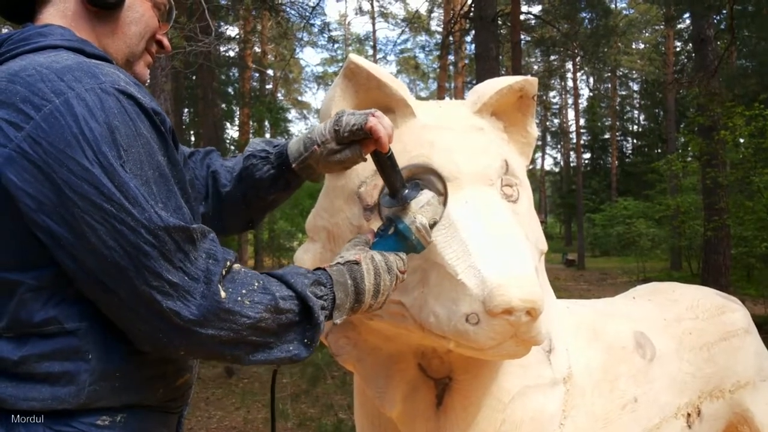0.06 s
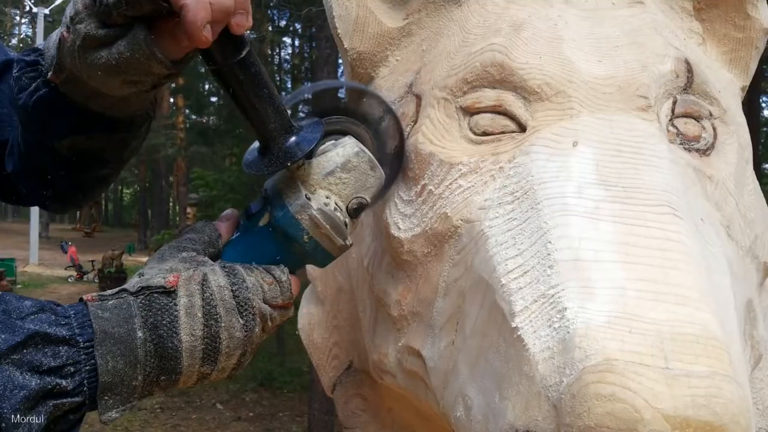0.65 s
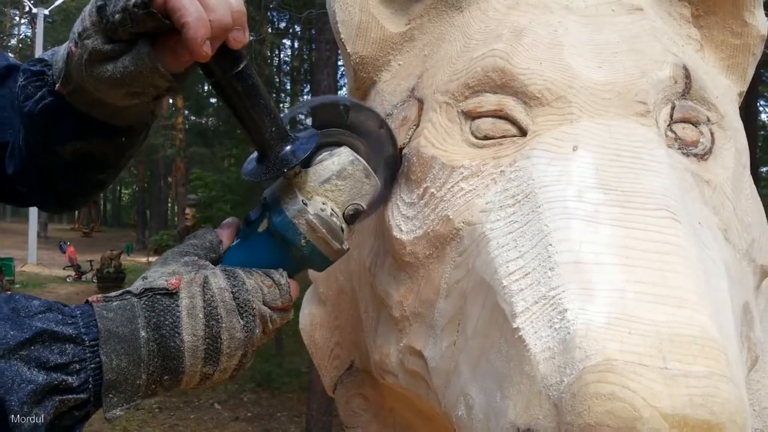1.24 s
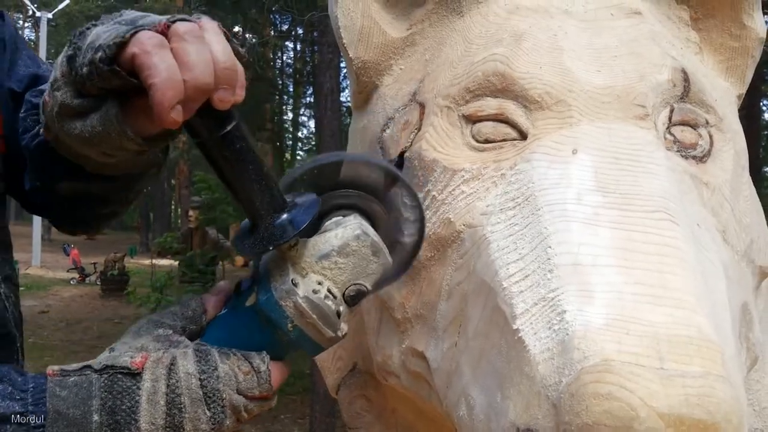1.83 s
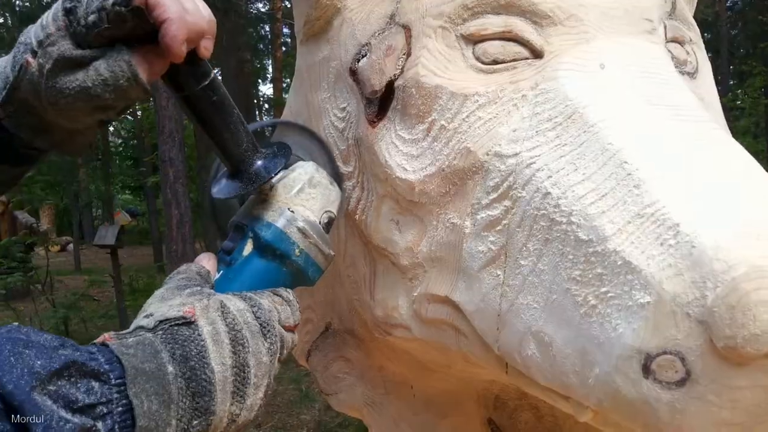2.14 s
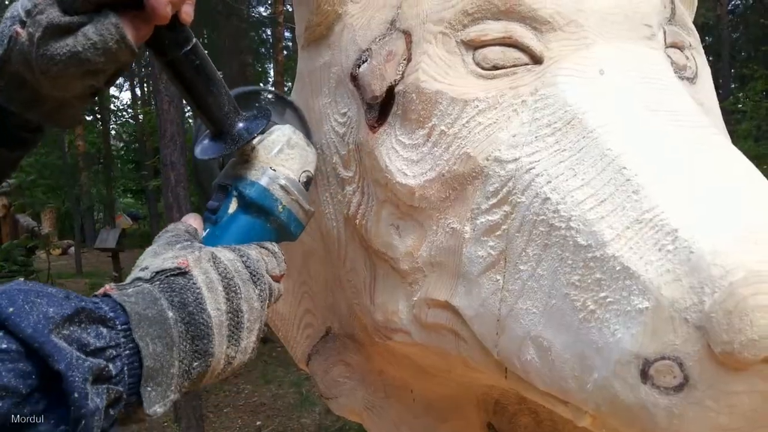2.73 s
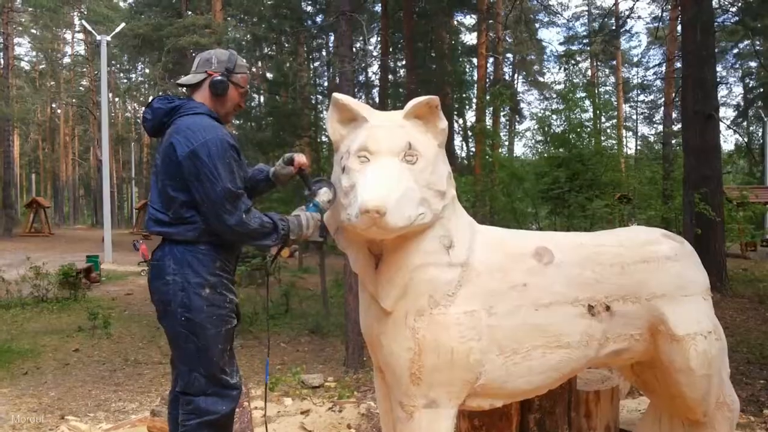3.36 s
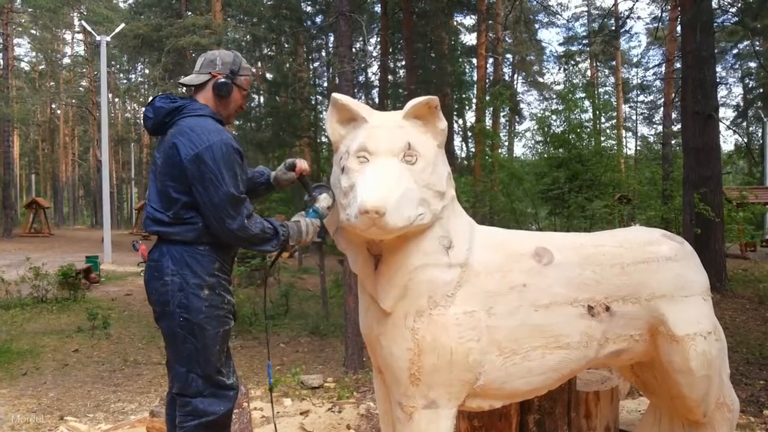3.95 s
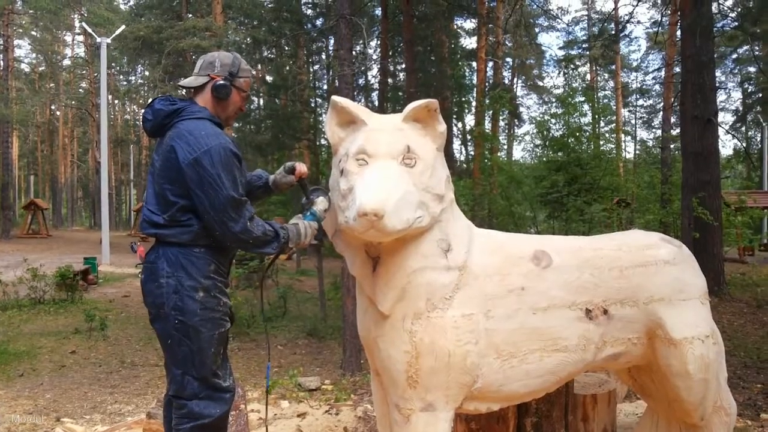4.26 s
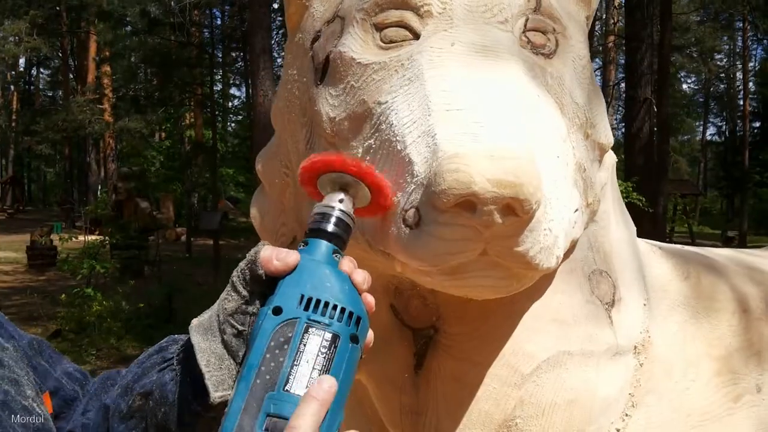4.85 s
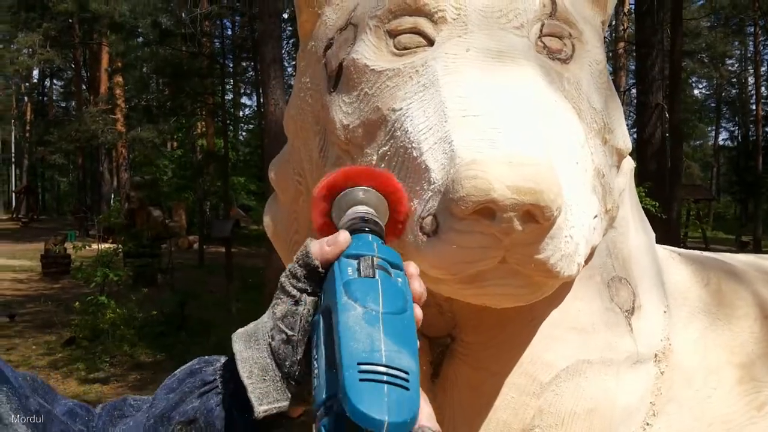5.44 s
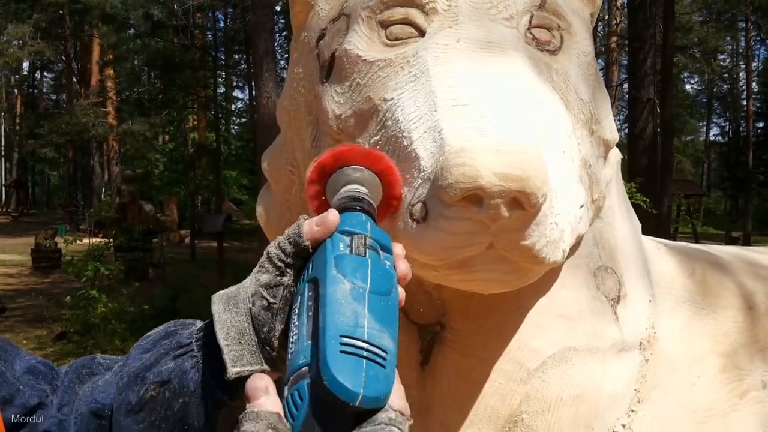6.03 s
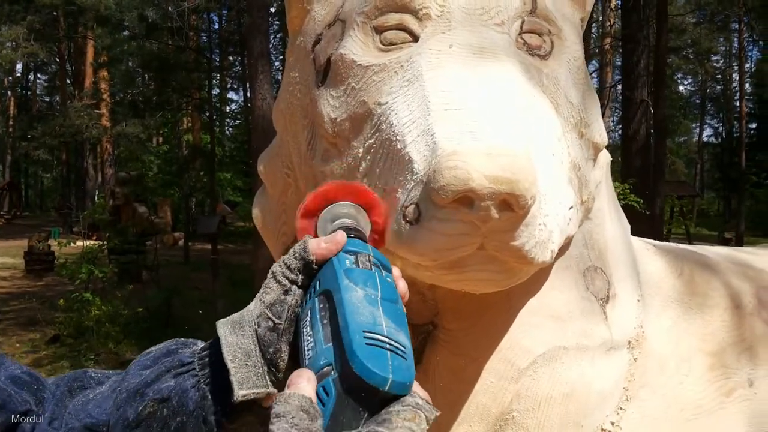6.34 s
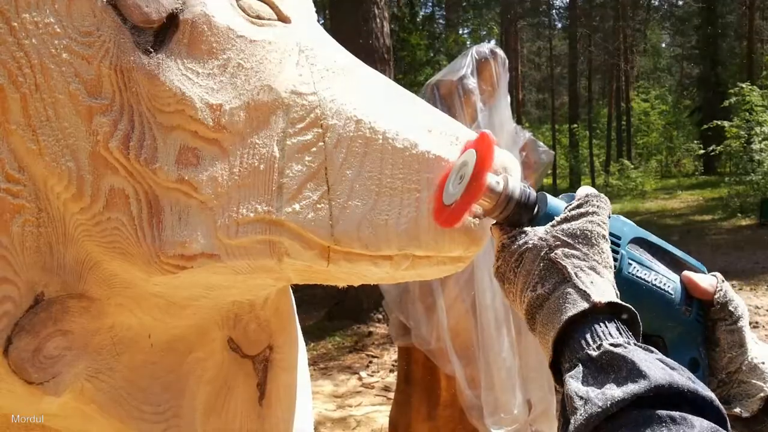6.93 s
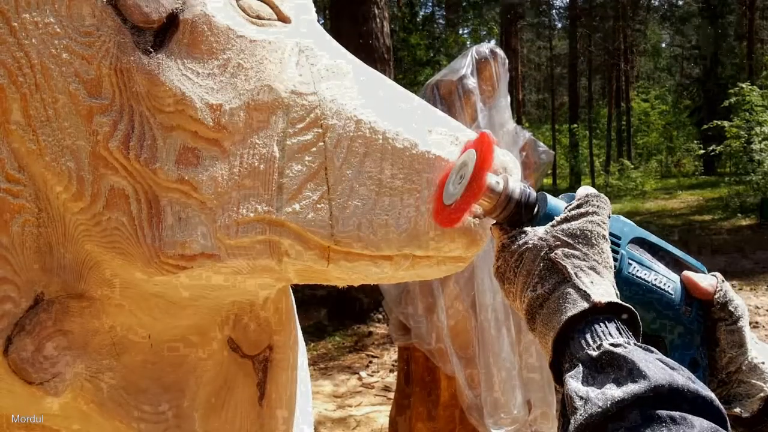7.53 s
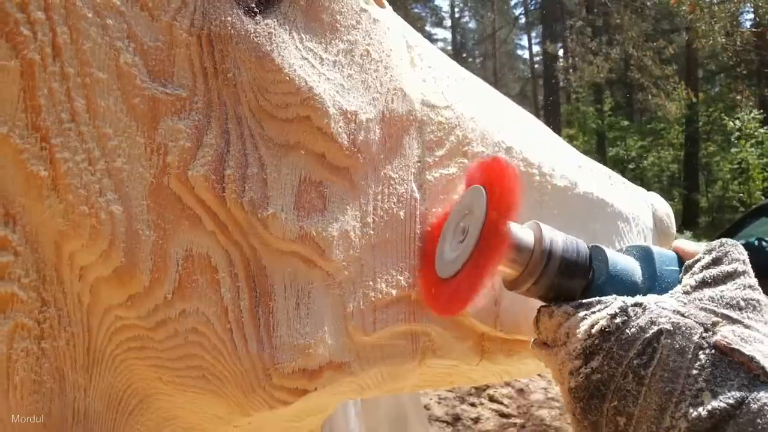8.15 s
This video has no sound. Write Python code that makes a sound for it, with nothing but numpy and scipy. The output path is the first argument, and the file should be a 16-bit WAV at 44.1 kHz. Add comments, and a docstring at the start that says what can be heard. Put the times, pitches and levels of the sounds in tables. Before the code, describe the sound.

High whining and hissing of an angle grinder sanding a wooden sculpture, a short gap, then a drill brushing the wood.

```python
"""An angle grinder with a sanding disc carves a wooden sculpture outdoors, close by and then further off.
After a moment of silence an electric drill takes over with an abrasive wheel brush. Random impacts of
grit rasp the wood, fan air and fine scratching hiss, and rotor and gears whine at multiples of the shaft
speed. A low 25 Hz flutter runs under both tools. The short stretches are cut hard together, in mono."""
import sys
import numpy as np
from scipy import signal
from scipy.fft import rfft, irfft, next_fast_len
from scipy.io import wavfile
from scipy.ndimage import uniform_filter1d, map_coordinates

SR = 44100
rng = np.random.default_rng(int(sys.argv[2]) if len(sys.argv) > 2 else 0)


def transcribe(u):
    """Save the signal u as a 16-bit wav file named by the first command-line argument.

    u: samples, shape (n,) or (channels, n), limited to [-1, 1]; the rate is SR.
    q: integer samples, one column per channel.
    """
    v = np.clip(np.atleast_2d(u).T, -1, 1)
    q = np.round(v * 32767).astype(np.int16)
    wavfile.write(sys.argv[1], SR, q)


N = 361179


def amp(db):
    """Amplitude ratio of a level in decibels."""
    return 10 ** (np.asarray(db) / 20)


def unit(x):
    """Normalisation to rms 1."""
    return x / np.sqrt(np.mean(x ** 2) + 1e-18)


def shape(x, gain):
    """Linear filtering: the spectrum is multiplied by gain(f)."""
    size = next_fast_len(len(x) + 4096)
    f = np.arange(size // 2 + 1) * SR / size + 0.00093  # the offset avoids 0 Hz
    return irfft(rfft(x, size) * gain(f), size)[:len(x)]


def colour(x, points):
    """Spectral shaping by (f/Hz, gain/dB) points with steep skirts, at rms 1."""
    hz, db = np.transpose(points)
    def gain(f):
        skirts = 1 / (1 + (.85 * hz[0] / f) ** 8) / (1 + (f / (1.08 * hz[-1])) ** 24)
        return skirts * amp(np.interp(np.log(f), np.log(hz), db))
    return unit(shape(x, gain))


def wander(t, hz):
    """Smooth random fluctuation of rms 1, with hz new values a second."""
    knots = rng.standard_normal(4096)
    return unit(map_coordinates(knots, [(t - t[0]) * hz], order=3, mode="wrap"))


def swell(t, centre, length):
    """Raised-cosine envelope, from 0 to 1 and back."""
    return np.cos(np.pi * np.clip((t - centre) / length, -.5, .5)) ** 2


def phase(hz):
    """Phase in radians is the time integral of frequency."""
    return 2 * np.pi * np.cumsum(hz) / SR


def lobe(angle, depth):
    """Periodic amplitude modulation: one peak a turn, narrower at greater depth."""
    return unit(np.exp(depth * np.cos(angle)))


def harmonics(angle, table):
    """Harmonic series of a shaft angle, from rows of (multiple, rms level/dB)."""
    return sum(np.sqrt(2) * amp(db) * np.sin(round(k) * angle + rng.uniform(0, 2 * np.pi))
               for k, db in table)


# flutter, a row a stretch (delay/s, level/dB, main resonance f/Hz, its gain/dB, upper modes' gain/dB)
FLUTTER_STRETCHES = [(0.039, -32, 197, 3.5, -9), (0.0175, -35, 186, -4.5, -6.5),
                     (0.01273, -37, 190, -1, -3), (.039, -30, 183, 2, -3.5), (0.029, -36.5, 211.4, 3, -9),
                     (0.039, -36.5, 215, 2, -7), (0.0122, -34.5, 210, 7, 4), (0.01105, -36, 192, -0.5, -15)]
# its constant low and upper resonances (f/Hz, bandwidth/Hz, gain/dB)
LOW_MODES = [(119, 18, -1), (264, 38, 2)]
UPPER_MODES = [(350.6, 17, 2), (477, 30, 1)]
# rumble spectrum (f/Hz, relative level/dB)
RUMBLE = [(20, -29), (50, -15.5), (80, -24), (120, -6.5), (180, -10), (300, -2)]
FLUTTER_HZ, FLUTTER_TOP_HZ, RUMBLE_DB = 25, 284, -8

def flutter(t, delay, db, main_hz, main_db, upper_db):
    """Forced resonance: a periodic pulse train rings low modes, over a faint rumble."""
    count = np.floor((t - delay) * FLUTTER_HZ)
    pulses = np.diff(count, prepend=count[0])
    modes = list(LOW_MODES) + [(main_hz, 34, main_db)]
    def ring(f, table):
        return sum(amp(gain) / (1 + 1j * (f * f - hz * hz) / (f * width)) for hz, width, gain in table)
    def response(f):
        low = ring(f, modes) / (1 + (f / FLUTTER_TOP_HZ) ** 20) / (1 + (80 / f) ** 4)
        return low + amp(upper_db) * ring(f, UPPER_MODES)
    rumble = amp(RUMBLE_DB) * colour(rng.standard_normal(len(t)), RUMBLE)
    return amp(db) * (unit(shape(pulses, response)) + rumble)


# the disc catches the wood (t/s, gain/dB)
KNOCKS = [(2.953, 4.5)]
# modes of the solid wood (f/Hz, relative level/dB, T60/s)
WOOD_MODES = [(330, -16, .01), (690, 4, .007)]
CRACK_DB, CRACK_T60_S = -15, .006

def knocks(t):
    """Impact excitation: fibres tear with a crack and the wood's damped modes ring briefly."""
    out = np.zeros(len(t))
    for start, db in KNOCKS:
        age = np.maximum(t - start, 0)
        ring = sum(amp(level - 60 * age / t60) * np.sin(2 * np.pi * hz * age)
                   for hz, level, t60 in WOOD_MODES)
        crack = amp(CRACK_DB - 60 * age / CRACK_T60_S) * rng.standard_normal(len(t))
        attack = 1 - np.exp(-age / 0.001)
        out += amp(db) * attack * (ring + crack)
    return out


# wavering tones in the grinder's whine (start t/s, end t/s, f/Hz, level/dB)
WAVERING_TONES = [(2.4, 3.102, 1016, -29.5), (3.094, 4.402, 1044, -38.5)]

def wavering_tones(t):
    """Random modulation: two tones near 1 kHz in the grinder's whine, unsteady in pitch and level."""
    out = np.zeros(len(t))
    for start, end, hz, db in WAVERING_TONES:
        progress = np.clip((t - start) / (end - start), 0, 1)
        envelope = np.sqrt(np.abs(np.sin(np.pi * progress)))
        tone = np.sin(phase(hz * (1 + 0.003 * wander(t, 19.8))))
        out += amp(db) * envelope * unit(tone * amp(1.9 * wander(t, 90)))
    return out


def grit(t, per_second, spread_db):
    """Shot noise: grains of uneven size strike at random instants."""
    hits = rng.random(len(t)) < per_second / SR
    return unit(hits * rng.standard_normal(len(t)) * amp(spread_db * rng.standard_normal(len(t))))


def hiss(source, spectrum, hiss_db, sizzle_db):
    """Broadband noise of fan air and fine scratching: hiss below 10 kHz, sizzle above."""
    noise = colour(source, spectrum)
    low = shape(noise, lambda f: 1 / (1 + (f / 10000) ** 16))
    return unit(low) * amp(hiss_db) + unit(noise - low) * amp(sizzle_db)


# swells and fades in either tool's whine, by rotor multiple (centre t/s, length/s, change/dB)
WHINE_SWELLS = {1: [(5.1, 0.98, 12), (7.2, 1.7, 7)], 4: [(4.93, 0.069, -16), (4.98, 0.054, 6),
                (5.63, 0.074, 4.5)], 8: [(4.99, .16, -9), (5.36, 0.11, 3), (5.47, 0.1, -4),
                (5.75, 0.19, -10), (6.15, .85, 2.5)], 10: [(1.9, 1.3, 11)], 12: [(2.37, .3, 7),
                (2.78, .4, 8), (3.05, .3, 13.5), (3.73, .12, 6), (4.2, .2, 7), (5.25, .35, 7),
                (5.53, .2, 5), (5.73, 0.26, 6.5), (6.24, .08, -8), (6.41, 0.18, 7), (6.56, .16, -4)],
                28: [(5.29, .25, 17), (7.26, .45, 7)]}

def whine_swell_db(t, multiple):
    """Slow level modulation of one harmonic by the swells centred within this stretch."""
    return sum(db * swell(t, centre, length)
               for centre, length, db in WHINE_SWELLS.get(round(multiple), []) if t[0] <= centre <= t[-1])


# resonances and notches of the drill's housing, by direction (f/Hz, bandwidth/Hz, gain/dB)
HOUSING_FRONT = [(3960, 110, -6.5), (5350, 90, 4.5), (6900, 330, 12)]
HOUSING_SIDE = [(3756, 96, 7.9), (5760, 78, 5.7)]

def housing_db(hz, housing):
    """Resonant transmission: the housing lifts or damps a tone according to its frequency."""
    return sum(db / (1 + (2 * (hz - centre) / width) ** 2) for centre, width, db in housing)


# gear mesh harmonics (rotor multiple, depth of throb)
GEAR_HARMONICS = [(4, .09), (8, .48), (12, .15)]
GEAR_RATIO = 13  # rotor turns per chuck turn
# the drill swings from side-on to end-on; side-on, each mesh harmonic has its own gain
SWING_CENTRE_S, SWING_LENGTH_S, SIDE_ON_DB = 5.06, 0.19, (15.5, 0.5, -4)

def gears(t, rotor_hz, load, housing, mesh_db, load_db):
    """Gear meshing: four contacts a rotor turn, varying with load and throbbing once a chuck turn."""
    rotor = phase(rotor_hz)
    side_on = np.clip(.5 - (t - SWING_CENTRE_S) / SWING_LENGTH_S, 0, 1)
    out = 0
    for (k, throb), db, side_db, rise_db in zip(GEAR_HARMONICS, mesh_db, SIDE_ON_DB, load_db):
        level_db = db + side_db * side_on + rise_db * load + whine_swell_db(t, k)
        level_db += housing_db(round(k) * rotor_hz, housing)
        level_db += .8 * wander(t, hz=86)  # uneven teeth
        level_db += 0.1 * wander(t, hz=6.8)  # sway of the hand
        out += harmonics(rotor, [(k, level_db)]) * lobe(rotor / GEAR_RATIO, throb)
    return out


# drill, a row a stretch (base level/dB of rasp, hiss, sizzle and mesh harmonics 1, 2, 3;
# change/dB of harmonics 1, 2 at full load)
DRILL_STRETCHES = [(-24, -26.5, -17.5, -33.5, -31.5, -35.5, 4, 3),
                   (-22.5, -22.5, -21.5, -23.5, -45, -48, 1, 2),
                   (-24.5, -28.5, -19.5, -21, -27, -33, -2, 0.5),
                   (-21.5, -28, -21, -21.5, -33, -38.5, -1, 3.5)]
# rotor speed under the hand's load (t/s, f/Hz)
SPEED_FRONT = [(4.755, 473), (4.848, 478), (4.93, 492), (5.04, 501), (5.24, 500), (5.38, 480), (5.53, 467),
               (5.62, 450), (5.706, 443), (5.78, 448), (5.96, 445), (6.11, 457), (6.225, 452), (6.36, 426),
               (6.482, 443.7), (6.665, 450)]
SPEED_LIGHT = [(6.695, 488), (6.84, 492)]
SPEED_LOADED = [(6.87, 461), (6.97, 450)]
SPEED_SIDE = [(7.06, 479), (7.27, 481.5), (7.346, 473.2), (7.494, 475.7), (7.59, 468), (7.79, 477.5),
              (7.912, 469), (8.17, 470.4)]
# spectra of the brushed wood and the drill's hiss (f/Hz, relative level/dB)
WOOD_FRONT = [(370, -14), (680, -10), (880, -6.5), (1250, -5), (1960, -4), (2050, -8.5), (2350, -3),
              (3000, -23)]
WOOD_SIDE = [(330, -5.5), (380, -12), (770, -4), (920, -2), (1570, 1), (2010, -6), (2250, -1.5),
             (3000, -18)]
AIR_FRONT = [(3000, 0), (3320, -5.5), (3540, -4.5), (4260, -3), (5380, 0.5), (6650, -5.5), (8160, -13.5),
             (11980, -13), (13690, -0.5), (15650, 3)]
AIR_LIGHT = [(3000, -19), (4200, -9), (5400, 4), (8200, -14.5), (11000, -16), (15650, -1)]
AIR_SIDE = [(3000, -15), (3430, -12.5), (3790, -6), (4050, -9), (5750, -4), (6050, -10), (8160, -18),
            (10140, -18.5), (15650, 0.5)]
# motor harmonics (rotor multiple, base level/dB)
MOTOR_FRONT = [(1, -50.5), (3, -44), (16, -49), (28, -44.5)]
MOTOR_SIDE = [(1, -40.5), (2, -39), (3, -31), (28, -35)]
# heavier and lighter brush strokes (centre t/s, length/s, change/dB of rasp, hiss, sizzle)
BRUSH_STROKES = [(4.774, 0.21, 2.5, 0, -0.5), (4.98, 0.39, 5, 3, 0), (5.132, 0.18, 2.5, 4.5, 1.5),
                 (5.273, 0.18, 2.5, 0.5, 3), (6.022, 0.8, -1.5, -3, -2), (7.095, 0.42, 2, 1, -0.5),
                 (7.77, 0.23, 2.5, .5, -0.5)]
# whine and treble dip briefly (centre t/s, length/s, change/dB of whine, hiss, sizzle)
DIP = (6.99, .12, -24, -1.5, -8.5)
LOAD_HZ_PER_S, LOAD_SMOOTH_S = 63, 0.079  # deceleration of a heavy load; time it takes to build

def drill(t, stretch, speed, wood, air, housing, motor_lines):
    """Abrasion and rotor harmonics: the brush rasps, the fan chops the air, gears and motor whine."""
    rasp_db, hiss_db, sizzle_db, *mesh_db, first_rise_db, second_rise_db = stretch
    for centre, length, more_rasp, more_hiss, more_sizzle in BRUSH_STROKES:
        stroke = swell(t, centre, length)
        rasp_db += more_rasp * stroke
        hiss_db += more_hiss * stroke
        sizzle_db += more_sizzle * stroke
    dip_centre, dip_length, whine_dip_db, hiss_dip_db, sizzle_dip_db = DIP
    dip = swell(t, dip_centre, dip_length)
    speed_hz = np.interp(t, *np.transpose(speed))
    slowing = uniform_filter1d(-np.gradient(speed_hz, t), int(LOAD_SMOOTH_S * SR))
    load = np.tanh(slowing / LOAD_HZ_PER_S)  # towards 1 as the wood brakes the wheel, -1 as it speeds up
    rotor_hz = speed_hz * (1 + 0.0005 * wander(t, 60))
    rotor = phase(rotor_hz)
    mesh = gears(t, rotor_hz, load, housing, mesh_db, (first_rise_db, second_rise_db, 0))
    radiated = [(k, db + whine_swell_db(t, k) + housing_db(round(k) * rotor_hz, housing))
                for k, db in motor_lines]
    motor = harmonics(rotor, radiated) * amp(1.5 * wander(t, 39))
    rasp = colour(grit(t, per_second=8000, spread_db=1.1), wood) * amp(rasp_db)
    airflow = grit(t, per_second=30000, spread_db=2.1) * lobe(rotor, depth=0.076)
    treble = hiss(airflow, air, hiss_db + hiss_dip_db * dip, sizzle_db + sizzle_dip_db * dip)
    return rasp + treble + (mesh + motor) * amp(whine_dip_db * dip)


# grinder, a row a stretch (base level/dB of rasp, hiss, sizzle; gain/dB of the disc's hum)
GRINDER_STRETCHES = [(-21, -24.5, -26, -3.5), (-17.5, -25.5, -22.5, 0.5), (-18.5, -24, -24, -0.5),
                     (-27.5, -33.5, -31.5, -8.5)]
# rotor speed under the hand's load (t/s, f/Hz)
GRINDER_SPEED = [(0.25, 481), (.55, 492), (.85, 489.5), (1.45, 492), (1.62, 495), (1.8, 507), (1.945, 513),
                 (1.955, 464), (2.3, 460.5), (2.85, 468), (2.98, 461), (3.1, 462), (3.35, 450), (3.63, 451),
                 (3.73, 456), (3.8, 451), (4.08, 448), (4.15, 440), (4.35, 444)]
# spectra of the sanded wood and the grinder's hiss, by position (f/Hz, relative level/dB)
WOOD_MID = [(330, -14.5), (630, -11), (1570, -2), (1840, -10.5), (2350, -5.5), (3000, -16)]
WOOD_NEAR = [(370, -11), (690, -11), (840, -2), (1200, -0.5), (1290, -4.5), (1680, 0), (2510, -3.5),
             (3000, -14)]
WOOD_CLOSE = [(370, -15.5), (720, -12), (1100, -1.5), (1340, -3.5), (1500, -2.5), (2300, -9), (2570, -8),
              (3000, -19.5)]
WOOD_FAR = [(350, 0.5), (560, -4.5), (1100, -2.5), (2010, -6.5), (2510, -3), (3000, -14.5)]
AIR_MID = [(3000, -13.5), (3670, -13.5), (4970, -1.5), (5910, -5.5), (7630, -20.5), (9260, -24),
           (10300, -16.5), (11000, -29), (14800, -4)]
AIR_NEAR = [(3000, -7.5), (4050, -11), (4950, -4), (6360, -8.5), (7700, -21.5), (9200, -18), (10140, -12.5),
            (10840, -20.5), (12810, -19.5), (14890, 0.5), (15650, -9.5)]
AIR_CLOSE = [(3000, -5), (4190, -7), (4630, 2), (5120, -2.5), (5560, -0.5), (7390, -17), (9180, -15.5),
             (9810, -12), (10840, -18.5), (15650, 1.5)]
AIR_FAR = [(3000, -6.5), (4300, -9.5), (5290, 0), (7140, -14), (8200, -24), (10310, -16), (13240, -12),
           (15650, 1)]
# harmonics of the motor, by position, and of the disc (shaft multiple, base level/dB)
MOTOR_MID = [(1, -42.5), (10, -31.5), (12, -35)]
MOTOR_NEAR = [(1, -44), (10, -38.5), (12, -41), (31, -37)]
MOTOR_CLOSE = [(1, -42.5), (12, -39.5)]
MOTOR_FAR = [(1, -38.5), (10, -42), (12, -39.5)]
DISC_HUM = [(3, -42.5), (4, -43), (7, -41)]
# the disc is pressed harder or eased off (centre t/s, length/s, change of sizzle/dB)
DISC_PRESSES = [(.09, 0.11, 2), (1.53, .15, 1.5), (2.45, 0.55, 2), (3.14, 0.18, -3), (3.345, 0.24, 4.5),
                (3.56, .1, 3), (4.134, 0.18, 5), (4.34, 0.17, 5.5)]
PRESS_RASP_SHARE, PRESS_HISS_SHARE = 0.57, 0.73  # of that change
BEVEL_RATIO = 3.7  # rotor turns per disc turn
MAINS_HZ, SCRATCH_DB = 50, 4.5

def grinder(t, stretch, wood, air, motor_lines):
    """Modulated abrasion: the disc rasps, bites once a turn and rattles the motor's whistle."""
    rasp_db, hiss_db, sizzle_db, hum_db = stretch
    press_db = sum(db * swell(t, centre, length) for centre, length, db in DISC_PRESSES)
    speed_hz = np.interp(t, *np.transpose(GRINDER_SPEED))
    rotor = phase(speed_hz * (1 + .001 * wander(t, 40)))
    disc = rotor / BEVEL_RATIO
    bite = lobe(disc + 0.81 * wander(t, 90), depth=0.17)
    high_spot = np.cos(disc / 2) ** 12  # touches briefly once a turn, lifting the sizzle
    scratch = unit(amp(SCRATCH_DB * high_spot * (1 + .4 * wander(t, 130))))
    sparking = lobe(4 * np.pi * MAINS_HZ * t, depth=0.17)  # motor brushes, twice a mains cycle
    rasp = colour(grit(t, per_second=10000, spread_db=0.73), wood)
    rasp *= amp(rasp_db + PRESS_RASP_SHARE * press_db)
    airflow = grit(t, per_second=30000, spread_db=0.74) * bite * sparking * amp(0.95 * wander(t, 120))
    fundamental, *overtones = [(k, db + whine_swell_db(t, k) + 2 * wander(t, 25)) for k, db in motor_lines]
    whistle = harmonics(rotor, overtones) * lobe(disc + .45 * wander(t, 90), depth=1.2)
    hum = harmonics(rotor, [fundamental]) + harmonics(disc, DISC_HUM) * amp(hum_db)
    hiss_db += PRESS_HISS_SHARE * press_db
    sizzle_db += press_db + 20 * np.log10(scratch)
    return rasp + hiss(airflow, air, hiss_db, sizzle_db) + whistle + hum + wavering_tones(t)


# stretches heard from one position (start t/s, end t/s)
SPANS = [(0, .37), (.37, 1.95), (1.95, 3.097), (3.097, 4.403), (4.738, 6.68), (6.68, 6.856), (6.856, 6.98),
         (6.98, 8.19)]

def scene():
    """Superposition of tool and flutter in eight stretches, each with its own level and spectrum."""
    time = np.arange(N) / SR
    masks = [(time >= start) & (time < end) for start, end in SPANS]
    t = [time[mask] for mask in masks]
    mid, near, close, far = GRINDER_STRETCHES
    front, light, loaded, side = DRILL_STRETCHES
    tools = [grinder(t[0], mid, WOOD_MID, AIR_MID, MOTOR_MID),
             grinder(t[1], near, WOOD_NEAR, AIR_NEAR, MOTOR_NEAR),
             grinder(t[2], close, WOOD_CLOSE, AIR_CLOSE, MOTOR_CLOSE),
             grinder(t[3], far, WOOD_FAR, AIR_FAR, MOTOR_FAR),
             drill(t[4], front, SPEED_FRONT, WOOD_FRONT, AIR_FRONT, HOUSING_FRONT, MOTOR_FRONT),
             drill(t[5], light, SPEED_LIGHT, WOOD_SIDE, AIR_LIGHT, HOUSING_SIDE, MOTOR_SIDE),
             drill(t[6], loaded, SPEED_LOADED, WOOD_SIDE, AIR_SIDE, HOUSING_FRONT, MOTOR_FRONT),
             drill(t[7], side, SPEED_SIDE, WOOD_SIDE, AIR_SIDE, HOUSING_SIDE, MOTOR_SIDE)]
    out = knocks(time)
    for mask, tool, thumps in zip(masks, tools, FLUTTER_STRETCHES):
        out[mask] += tool + flutter(time[mask], *thumps)
    pause = SPANS[3][1]
    out *= np.where(time < pause, np.clip((pause - time) / 0.026, 0, 1), 1)  # quick fade into the silence
    return np.array([out, out])


def record(dry):
    """Band limiting: a steep elliptic low-pass at 15.8 kHz."""
    return signal.sosfilt(signal.ellip(12, .1, 80, 15800, fs=SR, output="sos"), dry)


dry = scene()
out = record(dry)
transcribe(out)
```